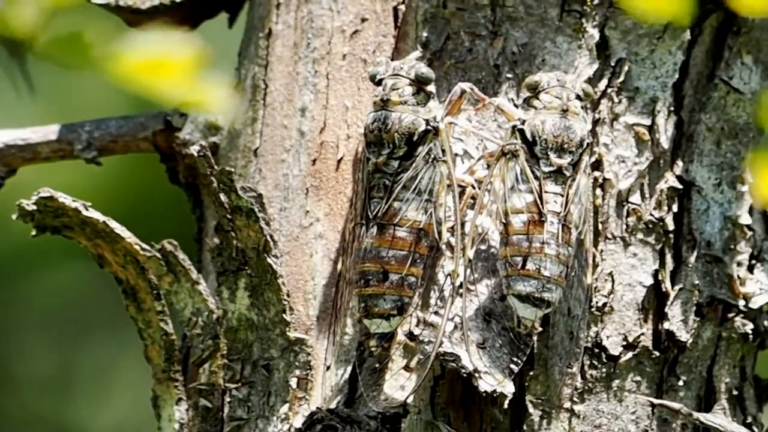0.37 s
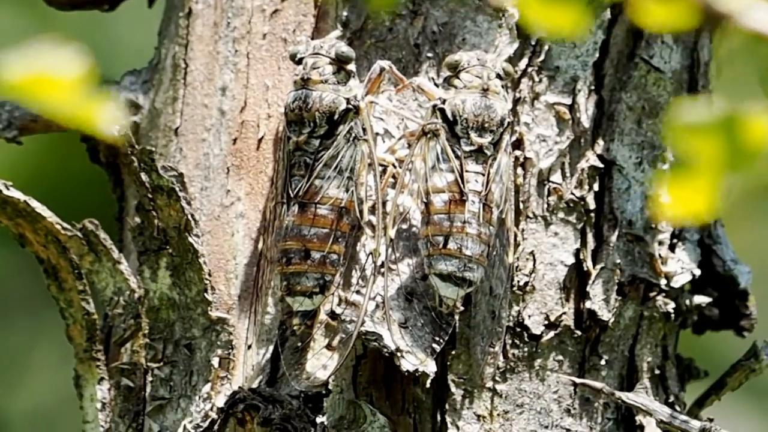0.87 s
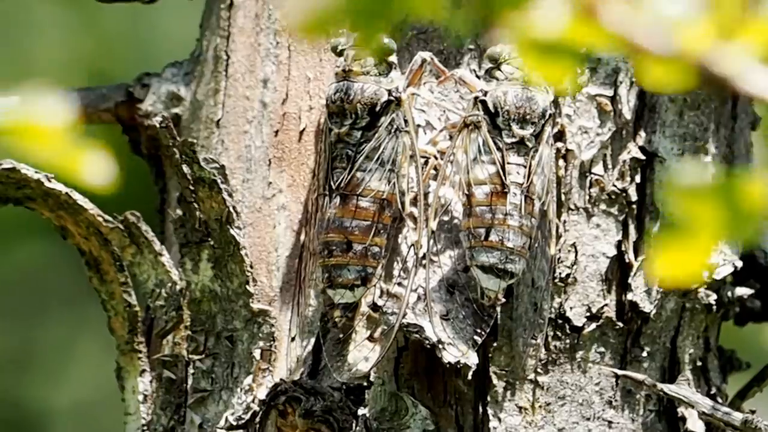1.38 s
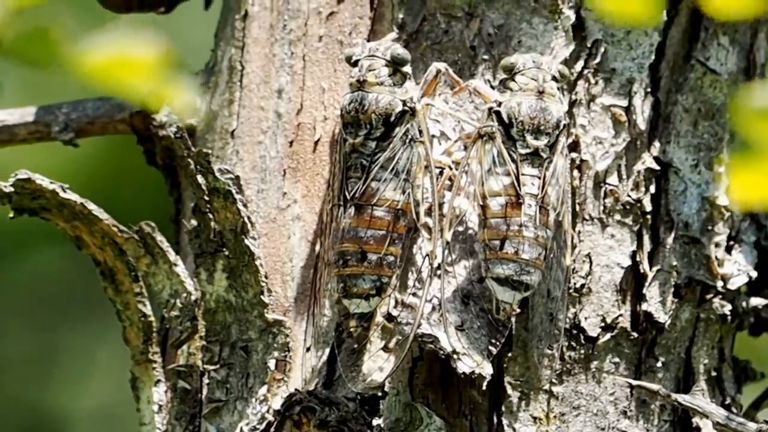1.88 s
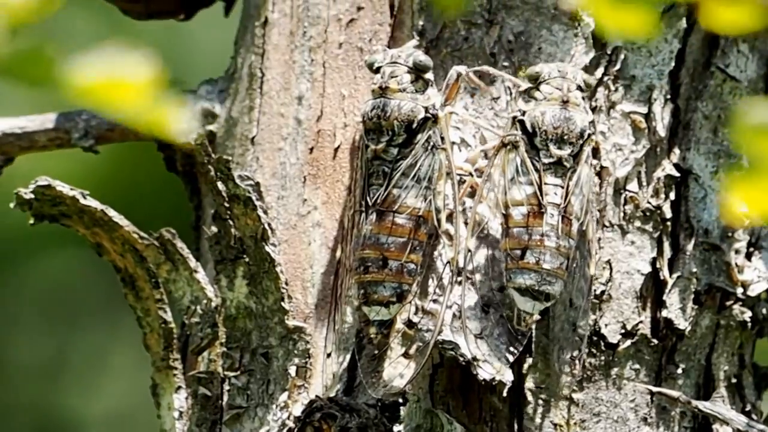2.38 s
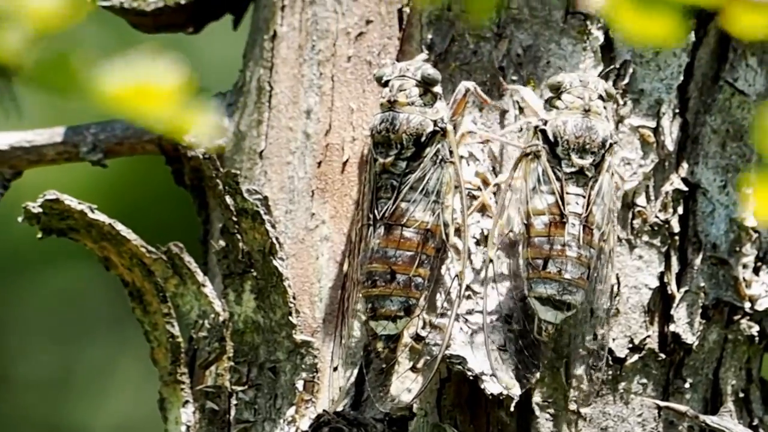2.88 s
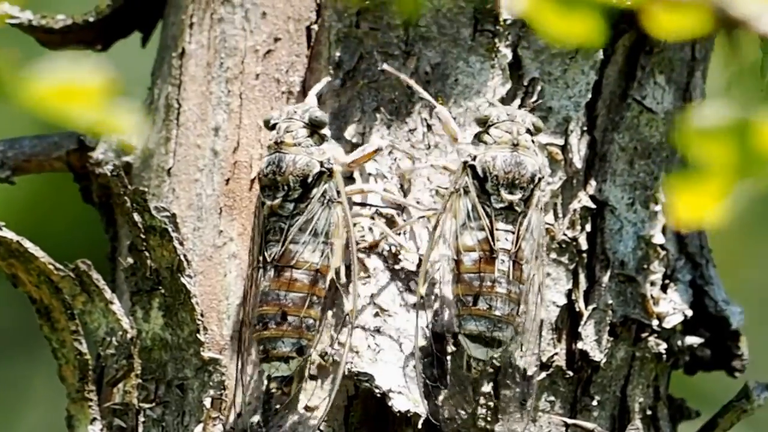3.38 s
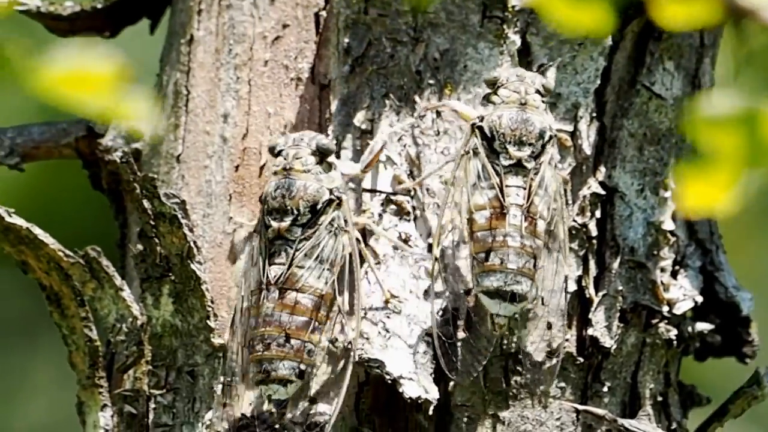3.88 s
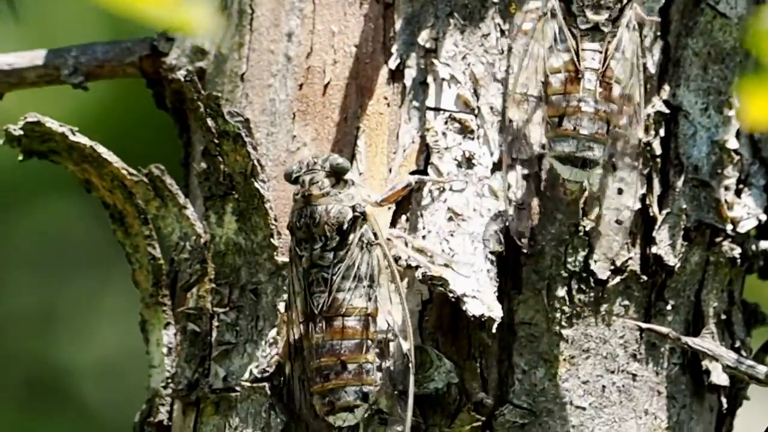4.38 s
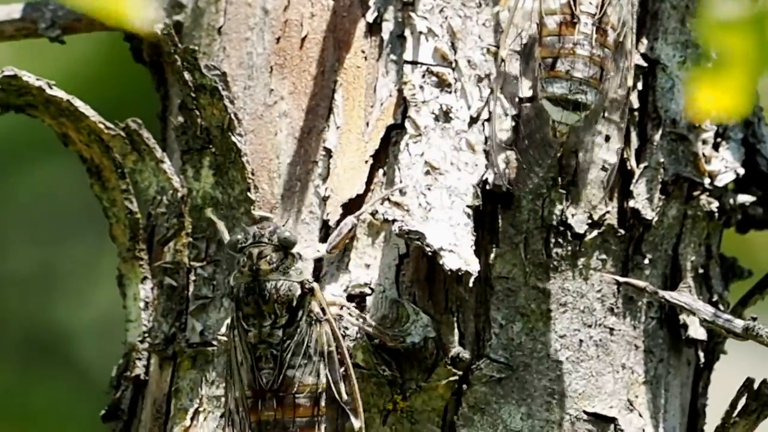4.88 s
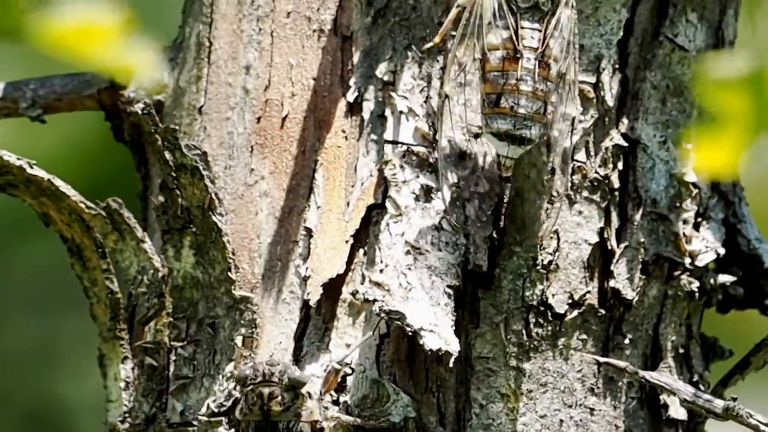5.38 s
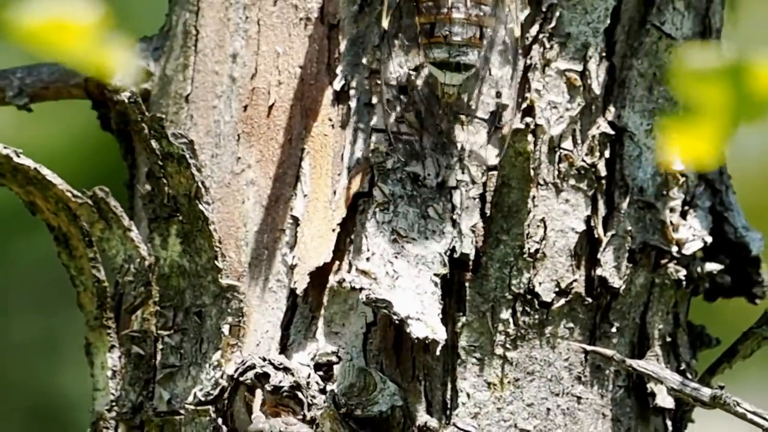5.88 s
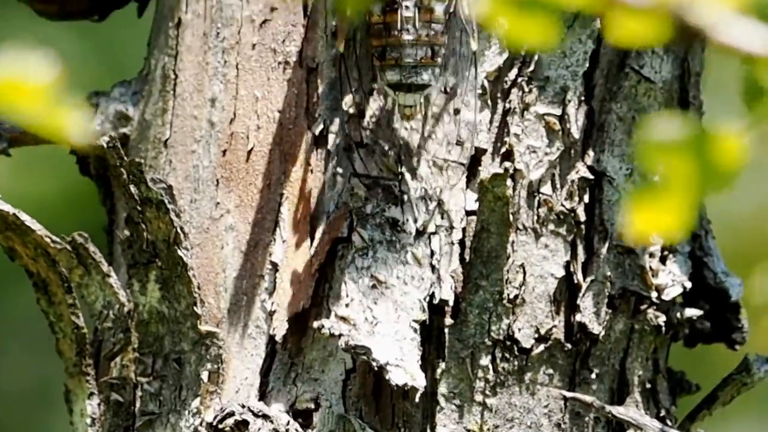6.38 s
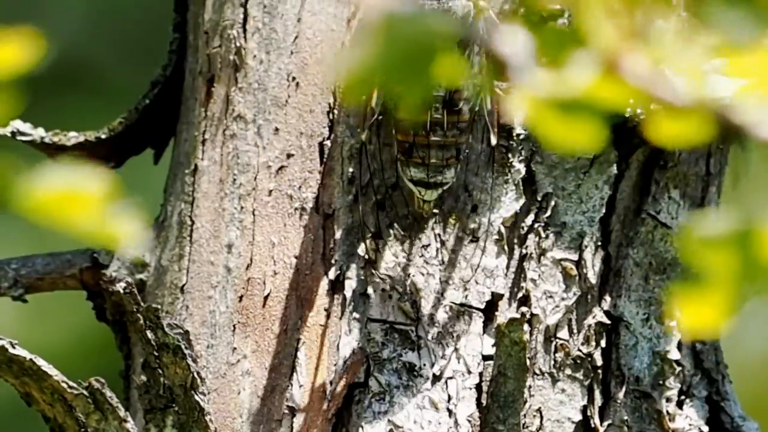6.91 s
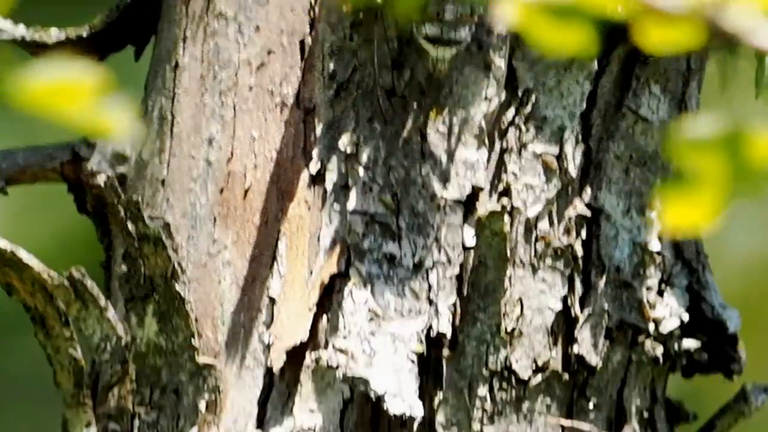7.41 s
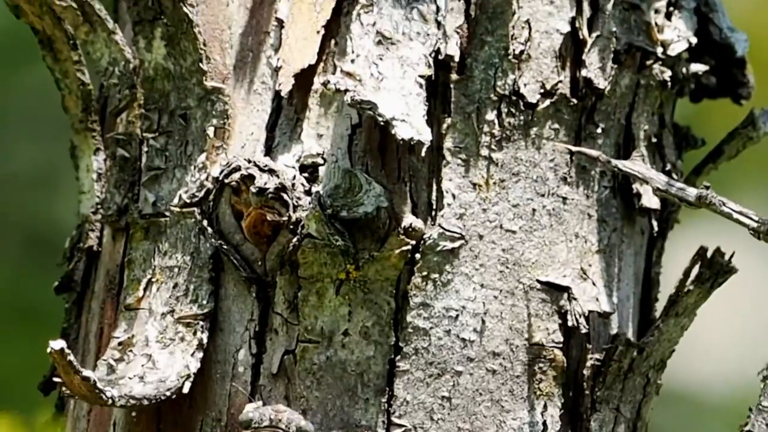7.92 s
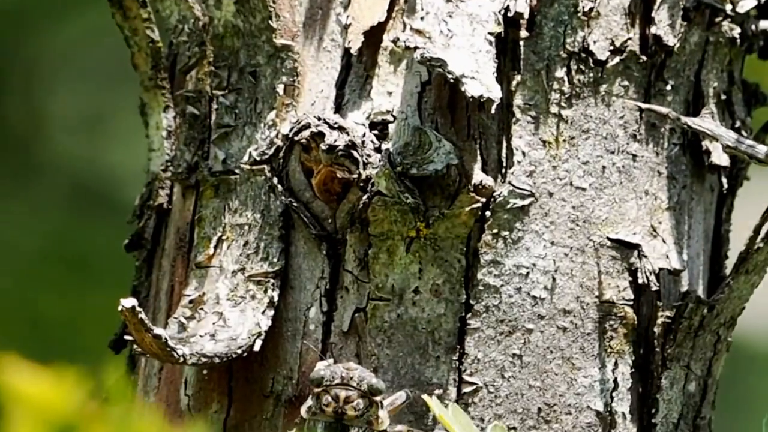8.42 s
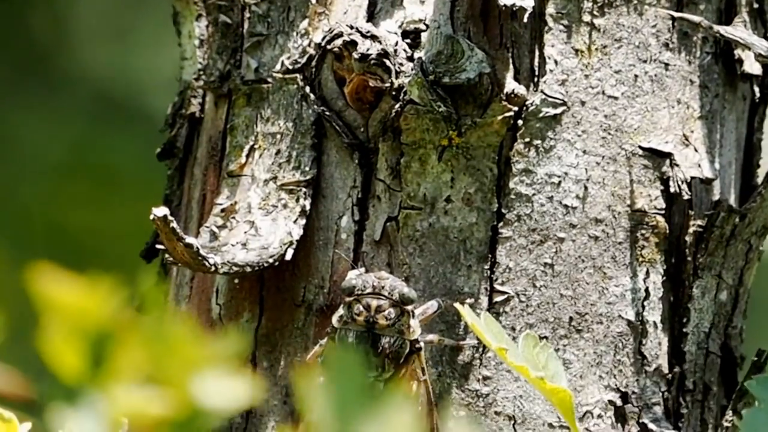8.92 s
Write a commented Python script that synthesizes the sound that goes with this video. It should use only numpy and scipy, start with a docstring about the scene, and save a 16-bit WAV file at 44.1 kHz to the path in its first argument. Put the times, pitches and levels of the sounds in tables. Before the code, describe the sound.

A bright, dry, pulsing cicada rasp continues throughout, made of several near insects overlapping out of step. The central singer falters around two and a half seconds, gives longer buzzes soon after three, then settles into regular calls, with another stumble near eight. Leaves add short fluttering treble echoes. Low wind gusts and dull thumps hit the stereo microphones, strongest on the right, over a faint countryside hum and far insects.

```python
"""Three cicadas and wind

Three cicadas sing on trees near a pair of microphones, over a far chorus and a low countryside hum.
A call is a run of tymbal twitches, mostly about 240 per s; each buckles eight ribs, whose clicks
ring the modes of a hollow abdomen. Leaves return the calls as short, fluttering echoes.
Chorus: random clicks on a broad body. Hum and wind: shaped noise, with a faint tone in the hum.
Gusts buffet the microphones, the right one most; the hardest eddies are decaying low thumps."""
import sys
import numpy as np
from scipy import signal
from scipy.fft import rfft, irfft
from scipy.io import wavfile
from scipy.ndimage import uniform_filter1d

SR = 44100
rng = np.random.default_rng(int(sys.argv[2]) if len(sys.argv) > 2 else 0)


def ratio(d):
    """dB to gain"""
    e = np.asarray(d, float) / 20
    return 10 ** e


def inscribe(sig):
    """Save sig as 16-bit PCM at rate SR to the path in sys.argv[1].

    A 1-D sig is mono; a 2-D sig holds one channel per row.
    Samples are clipped to [-1, 1] before scaling.
    """
    pcm = np.round(np.clip(np.atleast_2d(sig).T, -1, 1) * 32767)
    wavfile.write(sys.argv[1], SR, pcm.astype(np.int16))


N = 398223
TIME_S = np.arange(N) / SR
HZ = np.fft.rfftfreq(N, 1 / SR)
NEAR_RATE_HZ = 240

# singer straight ahead, weak and strong calls:
# (start [s], end [s], effort [dB], onset below effort [dB])
NEAR_CALLS = [(0.0, 0.013, -27, 0), (0.092, 0.139, -29, 3), (0.251, 0.354, -27, 7), (0.43, 0.486, -29.5, 6),
              (0.588, 0.696, -25.5, 3), (0.776, 0.835, -30, 2.5), (0.945, 1.01, -25.5, 4),
              (1.133, 1.176, -28.5, 4), (1.315, 1.392, -26.5, 4.5), (1.48, 1.524, -31, 0),
              (1.626, 1.698, -25.5, 4.5), (1.806, 1.874, -25.5, 5), (1.885, 1.902, -29.5, -1),
              (1.99, 2.033, -26.5, 8), (2.154, 2.21, -22.5, 10), (2.456, 2.539, -25.5, 1),
              (2.613, 2.747, -24.5, 13), (2.848, 2.887, -38.5, -4), (2.969, 3.137, -25.5, 6),
              (3.163, 3.456, -26.5, -2), (3.526, 3.683, -26, 8), (3.752, 3.868, -25, 11.5),
              (3.946, 3.997, -24.5, 2.5), (4.002, 4.133, -26, 6.5), (4.207, 4.366, -26, -2.5),
              (4.445, 4.568, -26.5, 1.5), (4.638, 4.772, -26, 3), (4.859, 4.939, -24, 3.5),
              (5.022, 5.109, -24.5, 17), (5.201, 5.302, -25, 6.5), (5.381, 5.478, -24.5, 13),
              (5.556, 5.619, -35, -1.5), (5.709, 5.803, -25, 3), (5.896, 6.01, -26, 18),
              (6.103, 6.145, -32, 0.5), (6.204, 6.312, -24, 2.5), (6.394, 6.445, -33, 1.5),
              (6.539, 6.613, -24.5, 3), (6.698, 6.746, -30.5, 4.5), (6.83, 6.934, -24.5, 2),
              (7.008, 7.06, -29.5, 8.5), (7.165, 7.234, -23, 11), (7.409, 7.492, -27.5, 15.5),
              (7.601, 7.659, -32.5, -1), (8.056, 8.164, -27, 4), (8.262, 8.336, -26.5, 3),
              (8.446, 8.477, -27, 7), (8.617, 8.705, -26, 4.5), (8.791, 8.846, -33, 2.5),
              (8.917, 9.014, -26, 6)]
# its stumbles, halting runs of twitches, mostly slower:
# (start [s], end [s], effort [dB], twitch rate [1/s])
HALTING_CALLS = [(1.023, 1.039, -28.5, 240), (2.339, 2.382, -28.5, 220), (2.801, 2.842, -27.5, 188),
                 (3.461, 3.51, -28.5, 195), (7.826, 7.842, -31.5, 180), (7.857, 7.962, -30, 200)]
# its single twitches: (time [s], effort [dB])
LONE_TWITCHES = [(2.33, -29.5), (2.384, -30), (2.39, -24), (2.403, -27), (2.423, -30), (2.435, -34),
                 (2.441, -26), (2.783, -28.5), (2.847, -27), (3.142, -30), (3.553, -38), (7.85, -33)]
# tuning of its body: (time [s], factor [1])
NEAR_PITCH = [(0, 0.97), (7.4, 0.98), (7.85, 1.04), (9.03, 1.005)]
# its top treble, dulling until 4.3 s, then slowly brightening: (time [s], level [dB])
NEAR_SHEEN = [(0, -3), (3.4, -7.5), (4.3, -16), (9.03, -9)]
# singer to the right, swelling calls: end [s]
SWELLING_ENDS_S = [.3, .524, .87, 1.233, 1.547, 1.856, 2.054, 2.285, 2.57, 2.897, 3.284, 3.589, 3.881,
                   4.179, 4.523, 4.716, 5.1, 5.448, 5.642, 5.824, 6.018, 6.312, 6.615, 6.915, 7.237, 7.525,
                   7.818, 8.104, 8.4, 8.707, 9.014]
# farther singer to the right, runs of even calls: (first call [s], last call [s], call length [s])
EVEN_RUNS = [(.03, 5.3, .068), (5.485, 6.74, .07), (6.866, 8.95, .08)]

# body modes, all: (frequency [Hz], width [Hz], level [dB])
# near singer, slack and tight
NEAR_SOFT = [(2170, 590, -12.5), (3540, 210, -12), (4448, 1180, 2.5), (5223, 250, 5), (6280, 1900, -13),
             (7806, 600, -8), (8950, 740, -7.5), (9950, 1900, -21.5)]
NEAR_HARD = [(2880, 860, -52), (3610, 2030, -13.5), (4757, 777, 5.5), (5582, 690, 3), (6590, 2000, -5),
             (8060, 350, -2), (9310, 580, -6.5), (10900, 3500, -10), (12860, 2500, -19)]
# the other singers and the chorus
SWELLING_BODY = [(2110, 540, -8.5), (2890, 265, 1.5), (4290, 790, 9), (5200, 1050, 5), (7150, 3200, -9),
                 (7780, 410, -7.5), (7990, 3000, -7.5), (10440, 550, -11.5), (12200, 1800, -21)]
EVEN_BODY = [(2570, 1000, -16), (3230, 190, -10.5), (4820, 810, 1.5), (5980, 1840, -11.5),
             (7390, 410, -6.5), (8400, 1740, -14.5), (9730, 780, -14), (10770, 1040, -19.5)]
FAR_BODY = [(2720, 1130, -4), (4820, 1250, 1.5), (7780, 2200, -13), (9600, 3600, -14), (11700, 5800, -22)]
# low modes shared by the two nearer singers
BELLY = [(2388, 1420, -5.5), (3337, 584, -1.5)]

# snap of each rib in a twitch, middle ones hardest: level [dB]
RIB_DB = [-11.5, -7, -5, -5, -8.5, -6.5, -9, -11.5]
# wait before each rib; quick, slower, quick again, so pitch dips within a twitch: share of base gap [1]
RIB_GAPS = [0, .78, .9, 1.03, 1.09, 1.01, .89, .8]

# wind gusts, before microphone gain: (start [s], held [s], level [dB])
GUSTS = [(0, 0.18, -46.5), (.8, 0.34, -56), (1.199, 0.1, -51), (1.4, 0.18, -50.5), (1.829, 0.094, -42),
         (2.001, 0.14, -59), (2.2, 0.32, -43), (2.93, 0.074, -44), (3.2, 0.065, -45), (3.34, 0.086, -42.5),
         (3.72, 0.058, -39.5), (4.08, 0.066, -44.5), (4.32, 0.081, -43), (4.52, 0.074, -50),
         (4.9, 0.041, -51.5), (6.48, 0.16, -45.5), (6.801, 0.043, -52), (8.05, 0.34, -62.5),
         (8.57, 0.02, -44.5), (8.8, 0.1, -46)]
# relative spectrum of wind on a microphone: (frequency [Hz], density [dB per Hz])
BUFFET = [(20, -36), (60, 2), (157, 1.5), (290, -10.5), (464, -17), (600, -30), (780, -58), (1320, -120)]
# hardest eddies, before microphone gain: (time [s], level [dB])
THUMPS = [(2.001, -38), (2.184, -26.5), (2.295, -34), (2.415, -41), (2.455, -27), (2.917, -30),
          (3.415, -34), (3.658, -46), (4.309, -31)]
# relative spectrum of the hum: (frequency [Hz], density [dB per Hz])
HUM = [(30, -9), (120, -5.5), (300, -7), (470, -6.5), (1050, 0), (1350, -8), (2000, -8), (6000, -6.5),
       (16000, -31)]
# faint low tone: (time [s], level [dB])
DRONE = [(0, -71.5), (7.8, -72.5), (8.07, -62.5), (8.4, -71), (8.6, -59), (9.03, -74)]
# left microphone against the right: (frequency [Hz], level [dB])
LEFT_MIC = [(300, -1.9), (2500, -2), (4700, -2.5), (6200, 0.9), (8300, 0.5), (10300, -7), (14000, -1.5)]


def near_singer(tight_db=-28.5, range_db=5, detune=0.012):
    """Weak effort leaves the body slack and low; strong effort tightens it."""
    brief_sag_db, held_s = 7.5, 0.16  # brief calls sag; no sag from held_s on
    ease_s, settle_s = 0.026, 0.017
    song = stumbles()
    for start, end, mean_db, ease_db in NEAR_CALLS:
        pitch = near_pitch(start) + detune * rng.standard_normal()
        sag_db = brief_sag_db * max(1 - ((end - start) / held_s) ** 2, 0)
        base_gap_ms = .412 if mean_db - sag_db / 2 > tight_db else .425
        s, size = twitches(start, end, NEAR_RATE_HZ, base_gap_ms / pitch)
        effort_db = mean_db + sag_db * np.interp(s, [start, end], [.5, -.5])
        effort_db = effort_db - ease_db * np.exp(-((s - start) / ease_s) ** 2)
        tight = 1.59 / (2.0 + np.exp((tight_db - effort_db) / range_db))
        tight = tight * (1 - 0.21 * np.exp(-abs(s - start) / settle_s))  # slacker at the onset
        bodies = [(np.sqrt(1 - tight), NEAR_SOFT), (np.sqrt(tight), NEAR_HARD)]
        song += call(bodies, s, size * ratio(effort_db), pitch)
    highpass = signal.butter(2, 10500, "high", fs=SR, output="sos")
    sheen = signal.sosfiltfilt(highpass, song)
    song = song + (curve(NEAR_SHEEN) - 1) * sheen
    return np.array([song, song])


def stumbles():
    """Halting runs and lone twitches of the near singer, on the tight body."""
    song = np.zeros(N)
    lone = [(s, s, db, NEAR_RATE_HZ) for s, db in LONE_TWITCHES]
    for start, end, effort_db, rate_hz in HALTING_CALLS + lone:
        pitch = near_pitch(start)
        s, size = twitches(start, end, rate_hz, .41 / pitch, shy_db=0, halt=.15, pace=0)
        song += call([(0.9, NEAR_HARD)], s, size * ratio(effort_db), pitch)
    return song


def near_pitch(s):
    """Tuning factor of the near singer's body at a time."""
    return np.interp(s, *np.transpose(NEAR_PITCH))


def swelling_singer(end_db=-27.0, swell_db=6, swell_s=0.078, rate_hz=250):
    """Rising effort swells each call up to a sudden stop."""
    song = np.zeros(N)
    for end in SWELLING_ENDS_S:
        s, size = twitches(end - swell_s, end, rate_hz, base_gap_ms=.418)
        size = size * ratio(end_db - swell_db * ((end - s) / swell_s) ** 2)
        pitch = 1 + 0.021 * rng.standard_normal()
        song += call([(0.9, SWELLING_BODY)], s, size, pitch, belly_db=-12.0)
    return placed(song, left_db=-1, left_late_ms=.105)


def even_singer(level_db=-35, rate_hz=246, beat_s=.1386, slip_s=.002):
    """Calls of one strength, seven a second, each slightly off the beat."""
    song = np.zeros(N)
    for first, last, length in EVEN_RUNS:
        for beat in np.arange(first, last + beat_s / 2, beat_s):
            start = beat + slip_s * rng.standard_normal()
            s, size = twitches(start, start + length, rate_hz, base_gap_ms=.4, slip=.15, shy_db=0.5)
            add(song, s, size * ratio(level_db), EVEN_BODY, 1 + 0.011 * rng.standard_normal())
    return placed(song, left_db=-1.5, left_late_ms=.128)


def call(bodies, s, size, pitch, belly_db=-11):
    """The ribs of one call ring the tymbal and the belly under it."""
    mix = np.zeros(N)
    for share, modes in bodies + [(ratio(belly_db), BELLY)]:
        add(mix, s, size * share, modes, pitch)
    return mix


def twitches(start, end, rate_hz, base_gap_ms, jitter=0.055, slip=0.055, shy_db=5, halt=.4, pace=.02):
    """Click times [s] and sizes: each muscle twitch buckles eight ribs in step with the ringing body."""
    drag = .0011  # tiring muscle: each beat gains twice this share
    rate_hz = rate_hz * (1 + pace * rng.standard_normal())  # each call has its own pace
    chance = rng.standard_normal((100, 2, len(RIB_DB)))
    count = np.arange(100)[:, None]
    beats = count + drag * count ** 2
    beats = beats + halt * (count > 0)  # short halt after the first twitch
    beat_s = start + (beats + jitter * chance[:, 0, :1]) / rate_hz
    gaps = RIB_GAPS * (1 + slip * chance[:, 1])
    s = beat_s + np.cumsum(gaps, 1) * base_gap_ms / 1000
    size = ratio(RIB_DB - shy_db * np.exp(-count / 3.4))  # shy onset
    sung = (beat_s[:, 0] < end - .0025) | (count[:, 0] == 0)
    return s[sung].ravel(), size[sung].ravel() * np.sqrt(SR / rate_hz)


def add(mix, s, size, modes, pitch):
    """Rings one call's clicks on a body tuned by pitch, into the mix."""
    at = np.maximum(np.round(s * SR).astype(int), 0)
    clicks = np.bincount(at - at.min(), size)
    sound = ring(clicks, [(hz * pitch, width, db) for hz, width, db in modes])
    part = mix[at.min():][:len(sound)]
    part += sound[:len(part)]


def ring(clicks, modes):
    """Each click rings all modes, which build up softly and die; body energy is 1."""
    t = np.arange(1024) / SR
    body = np.zeros(len(t))
    for k, (hz, width, db) in enumerate(modes):
        envelope = width * (width * t) ** 2 * np.exp(-np.pi * width * t)
        body += (-1) ** k * ratio(db) * envelope * np.sin(2 * np.pi * hz * t)
    return signal.oaconvolve(clicks, body / np.linalg.norm(body))


def placed(x, left_db, left_late_ms):
    """A source to the right reaches the left microphone later and weaker."""
    left = irfft(rfft(x) * np.exp(-2j * np.pi * HZ * left_late_ms / 1000), N)
    return np.array([ratio(left_db) * left, x])


def leaves(x, early_t60_s=.05, late_t60_s=1.0, early_db=-2, late_db=-12, treble_hz=7000, sway_hz=6.3):
    """Bark and swaying leaves scatter calls: close echoes and a short tail, unlike at each microphone."""
    t = np.arange(SR // 4) / SR  # echoes end at 0.25 s
    shape = (2, 3, 2, len(t))  # early/late, pose, microphone, time
    taps = rng.standard_normal(shape) * (rng.random(shape) < .3) * (t > .0003)
    highpass = signal.butter(2, treble_hz, "high", fs=SR, output="sos")
    taps = signal.sosfilt(highpass, taps)  # small leaves scatter treble best
    t60_s = np.array([early_t60_s, late_t60_s])[:, None, None, None]
    tails = taps * ratio(-60 * t / t60_s)
    tails = tails / np.linalg.norm(tails, axis=3, keepdims=True)
    echo = ratio(early_db) * tails[0] + ratio(late_db) * tails[1]
    # foliage flutters through three poses, and its echoes with it
    turn = np.pi * (sway_hz * TIME_S + np.arange(3)[:, None, None] / 3)
    poses = np.sqrt(2 / 3) * np.cos(turn)
    return x + signal.oaconvolve(x * poses, echo, axes=2).sum(0)[:, :N]


def wind(lumpy_db=5.0, thumps_per_s=30):
    """Eddies break on each microphone alone: lumpy rumble with sharper thumps."""
    lumps = uniform_filter1d(rng.standard_normal((2, N)), size=900)
    lumps = evened(uniform_filter1d(lumps, size=900))
    knocks = rng.standard_normal((2, N)) * (rng.random((2, N)) < thumps_per_s / SR) * 40
    rumble = coloured(rng.standard_normal((2, N)) * ratio(lumpy_db * lumps) + knocks, BUFFET)
    mic_gain = ratio(np.array([[-4], [4]]))
    return evened(rumble) * gusting() * mic_gain


def gusting(rise_db_per_s=118, fall_db_per_s=140, calm_db=-70.5):
    """Each gust rises, holds and dies away over a light steady breeze; powers add."""
    power = ratio(calm_db) ** 2
    for start, held, db in GUSTS:
        rise_db = rise_db_per_s * np.maximum(start - TIME_S, 0)
        fall_db = fall_db_per_s * np.maximum(TIME_S - start - held, 0)
        power = power + ratio(db - rise_db - fall_db) ** 2
    return np.sqrt(power)


def thumps(low_hz=60, high_hz=256.5, die_s=0.0032):
    """A hard eddy pushes the diaphragm once or twice."""
    t, out = np.arange(2000) / SR, np.zeros(N + 2000)
    for s, db in THUMPS:
        envelope = t / die_s * np.exp(1 - t / die_s)
        push = envelope * np.sin(2 * np.pi * rng.uniform(low_hz, high_hz) * t)
        out[round(s * SR):][:2000] += ratio(db) * push
    mic_gain = ratio(np.array([[-12], [4]]))
    return out[:N] * mic_gain


def far_chorus(level_db=-45, waver_db=4.0):
    """Many distant singers blur into a slightly wavering rasp, mostly from the right."""
    clicks = rng.standard_normal((3, N)) * (rng.random((3, N)) < .1)
    a, b, both = (evened(ring(c, FAR_BODY)[:N]) for c in clicks)
    waver = evened(uniform_filter1d(rng.standard_normal(N), size=5000))
    rasp = np.array([a, b]) + 1.95 * placed(both, left_db=-4.5, left_late_ms=0.13)
    return ratio(level_db + waver_db * waver) * rasp


def hum(level_db=-50, shared=0.58, tone_hz=377):
    """Distant air and traffic: noise partly alike in both microphones, with a faint unsteady tone."""
    a, b, both = rng.standard_normal((3, N))
    noise = np.array([a, b]) * np.sqrt(1 - shared) + both * np.sqrt(shared)
    wobble_rad = np.cumsum(rng.standard_normal(N)) * 0.0301
    tone = np.sqrt(2) * curve(DRONE) * np.sin(2 * np.pi * tone_hz * TIME_S + wobble_rad)
    return ratio(level_db) * evened(coloured(noise, HUM)) + tone


def read(points, hz):
    """Spectrum table at given frequencies, on a log frequency axis."""
    f, value = np.transpose(points)
    return np.interp(np.log(hz + 1), np.log(f + 1), value)


def curve(points):
    """Level table as a gain per sample."""
    return ratio(np.interp(TIME_S, *np.transpose(points)))


def evened(x):
    """Scales to rms 1."""
    return x / np.sqrt(np.mean(x ** 2))


def coloured(x, points):
    """Filters x by a spectrum table."""
    return irfft(rfft(x) * ratio(read(points, HZ)), N)


def scene():
    """All sources at the two microphones."""
    singers = near_singer() + swelling_singer() + even_singer()
    return leaves(singers) + far_chorus() + hum() + wind() + thumps()


def roll_off(x):
    """The treble ends steeply here."""
    return signal.sosfilt(signal.butter(12, 15740, fs=SR, output="sos"), x)


def record(dry):
    """The left microphone has its own response, shaded in the treble."""
    left = coloured(dry[0], LEFT_MIC)
    return roll_off(np.array([left, dry[1]]))


dry = scene()
out = record(dry)
inscribe(out)
```